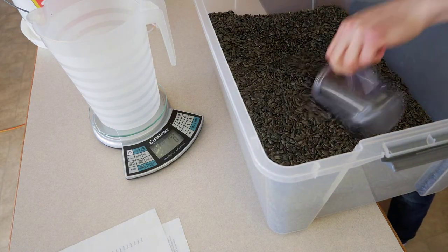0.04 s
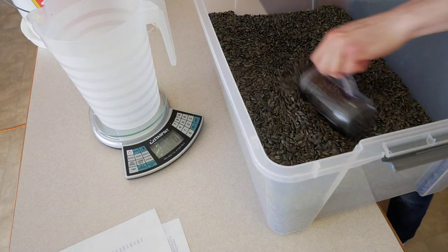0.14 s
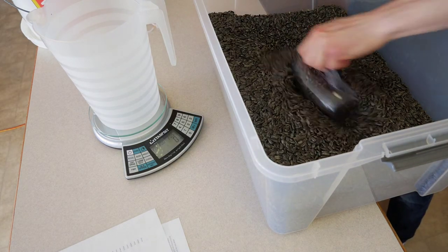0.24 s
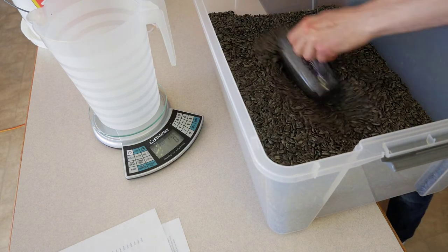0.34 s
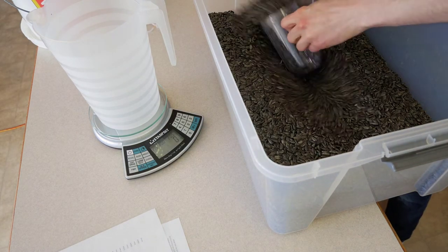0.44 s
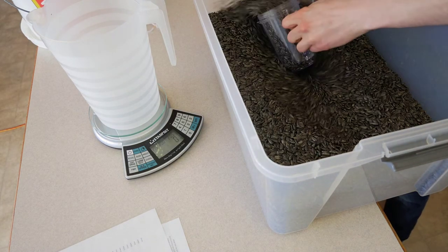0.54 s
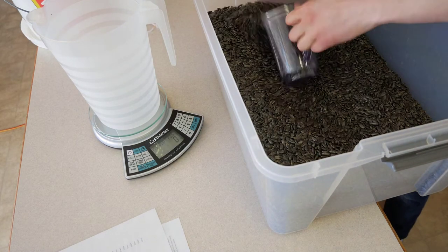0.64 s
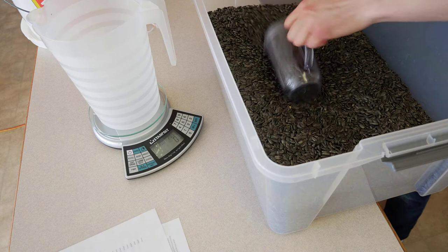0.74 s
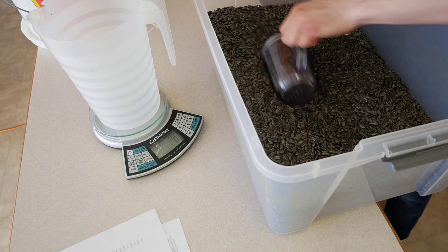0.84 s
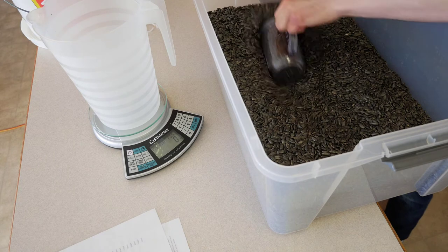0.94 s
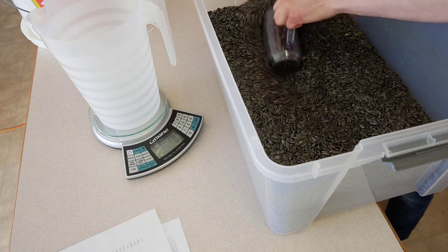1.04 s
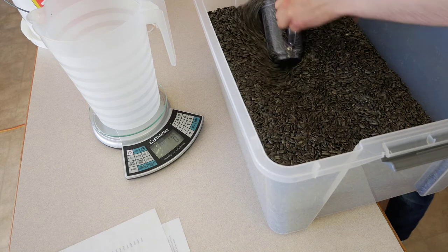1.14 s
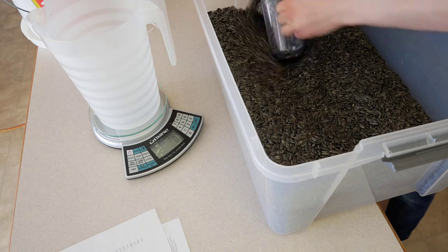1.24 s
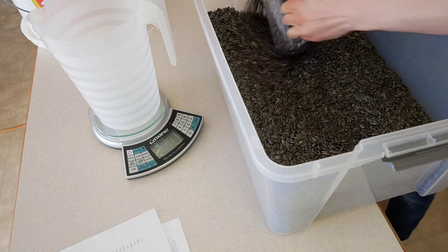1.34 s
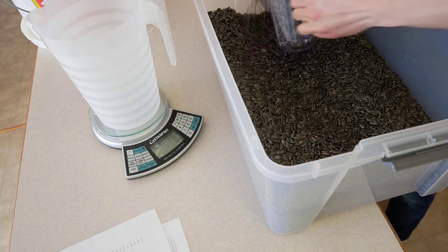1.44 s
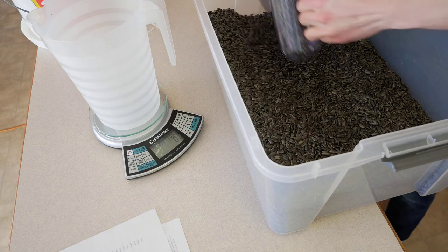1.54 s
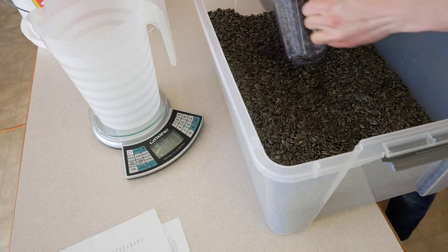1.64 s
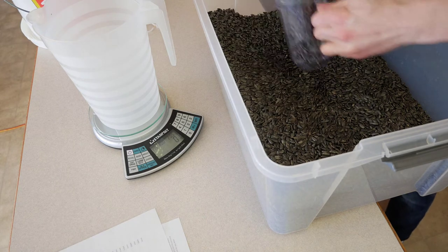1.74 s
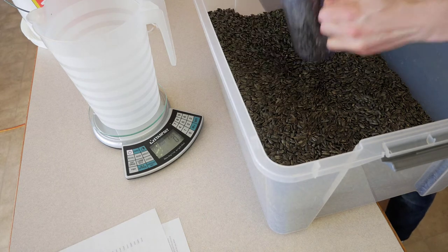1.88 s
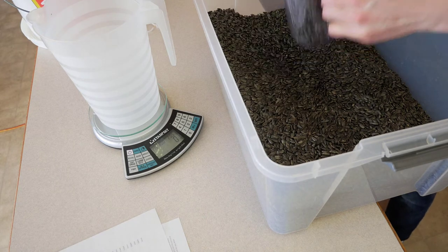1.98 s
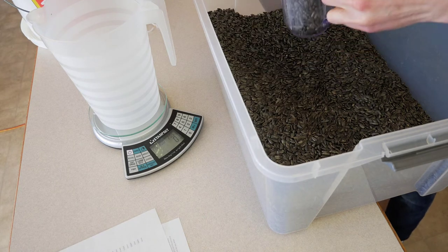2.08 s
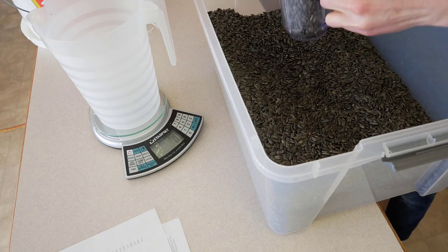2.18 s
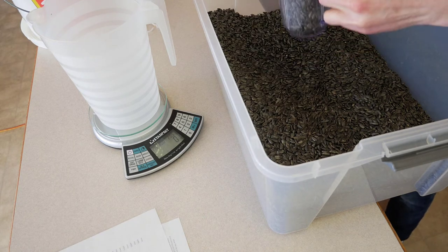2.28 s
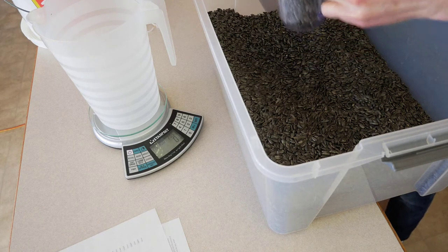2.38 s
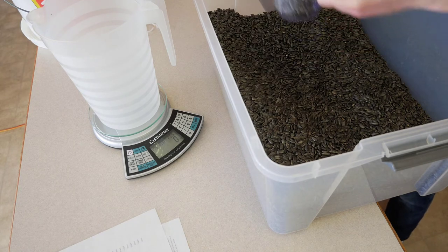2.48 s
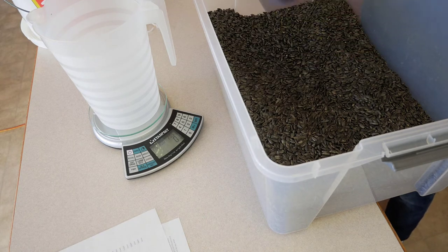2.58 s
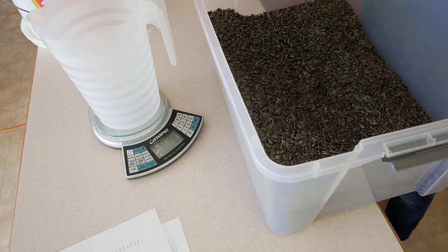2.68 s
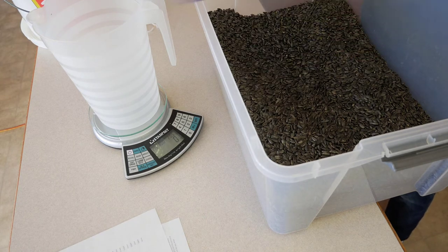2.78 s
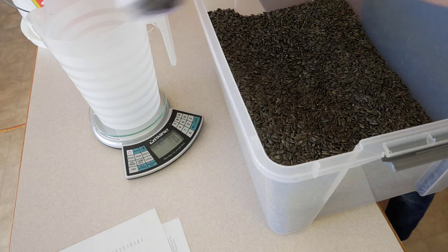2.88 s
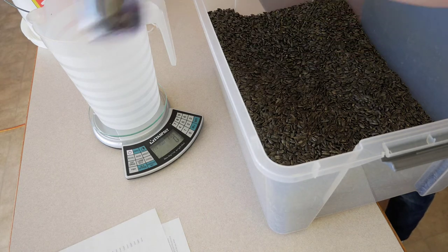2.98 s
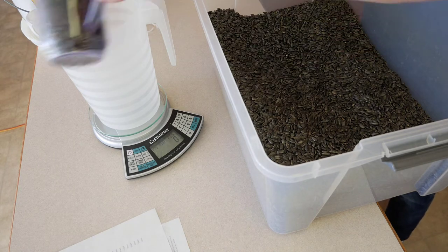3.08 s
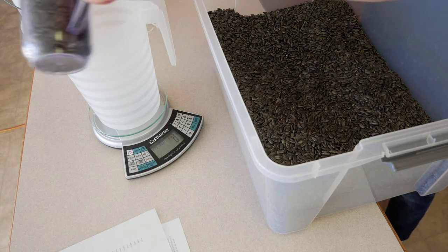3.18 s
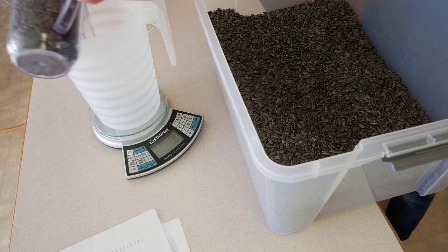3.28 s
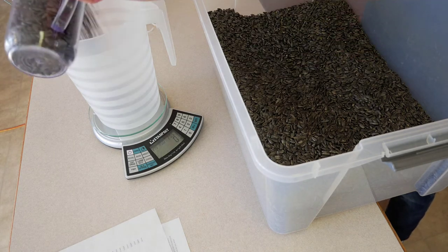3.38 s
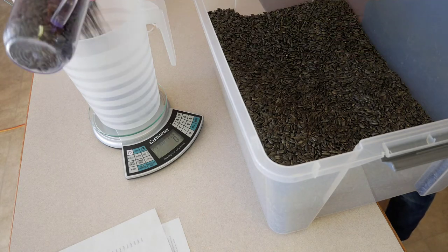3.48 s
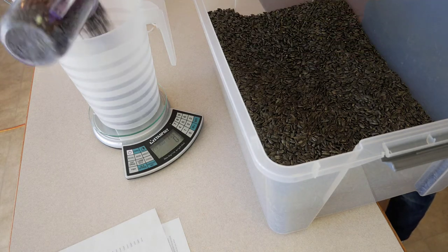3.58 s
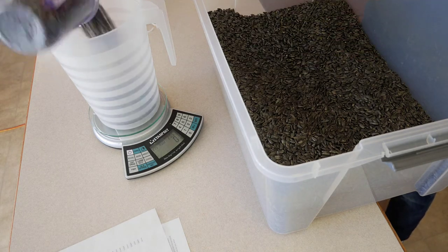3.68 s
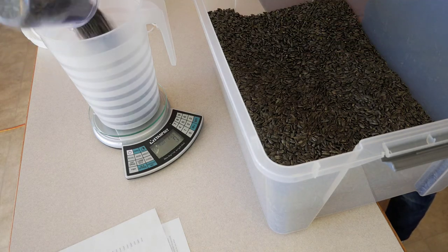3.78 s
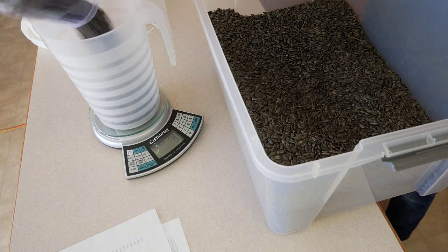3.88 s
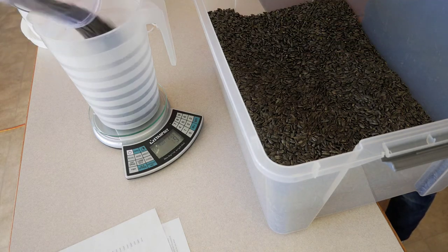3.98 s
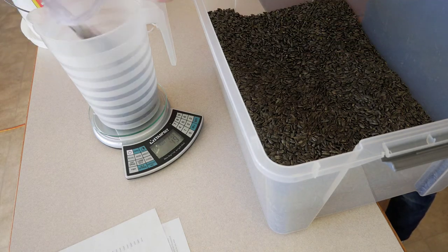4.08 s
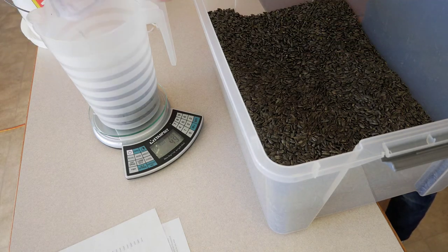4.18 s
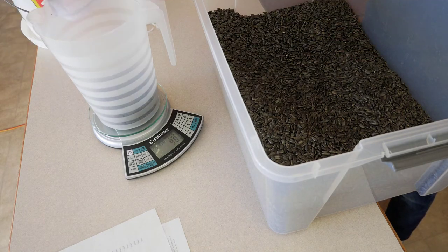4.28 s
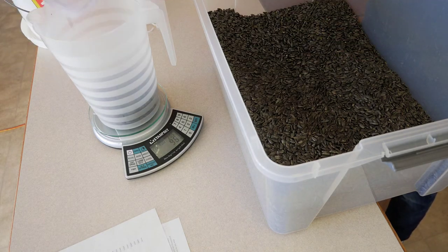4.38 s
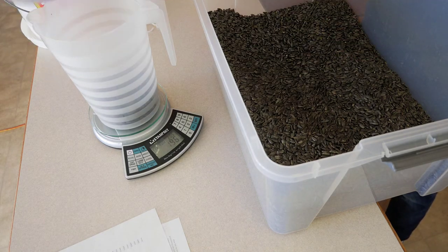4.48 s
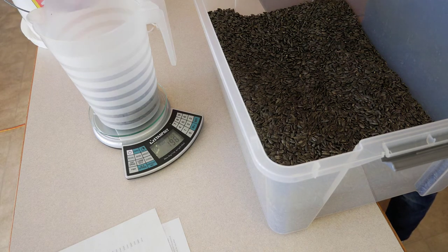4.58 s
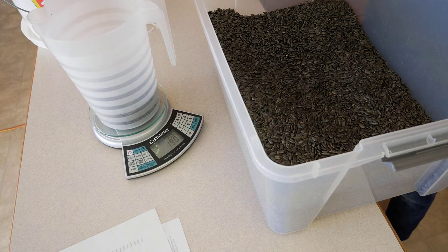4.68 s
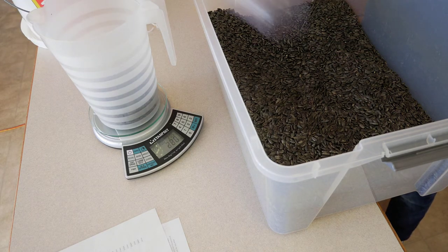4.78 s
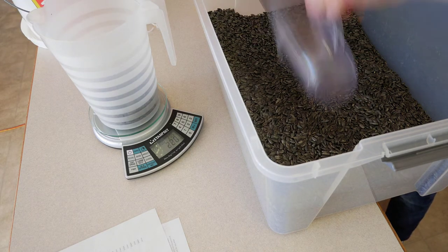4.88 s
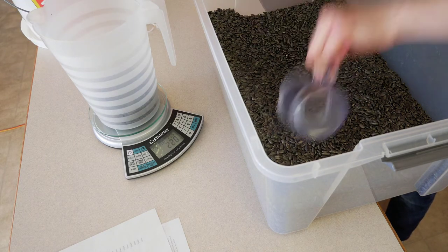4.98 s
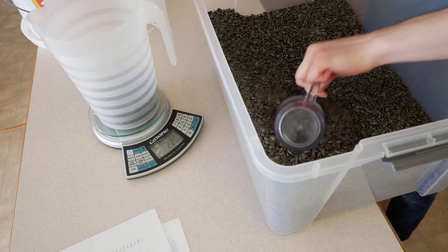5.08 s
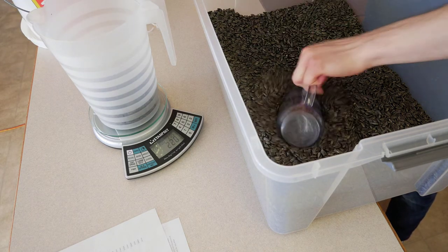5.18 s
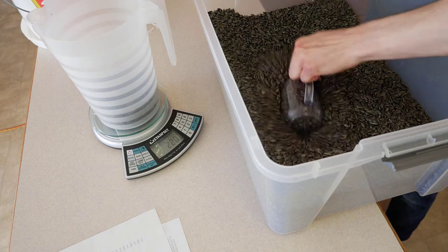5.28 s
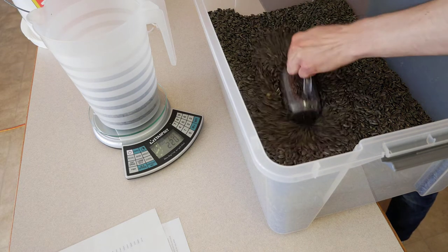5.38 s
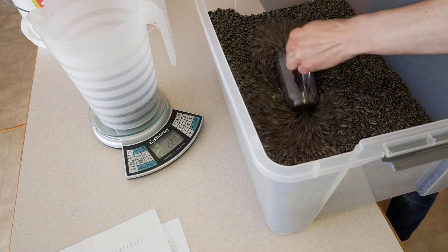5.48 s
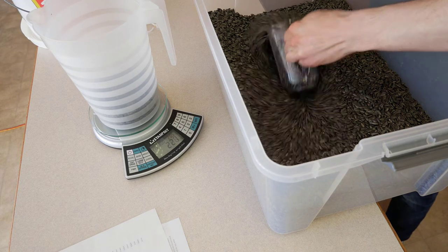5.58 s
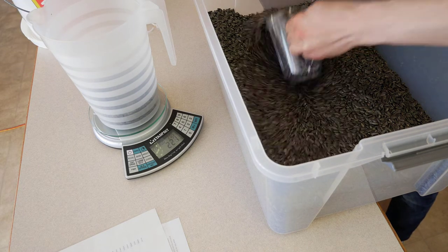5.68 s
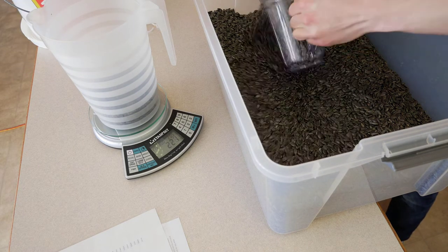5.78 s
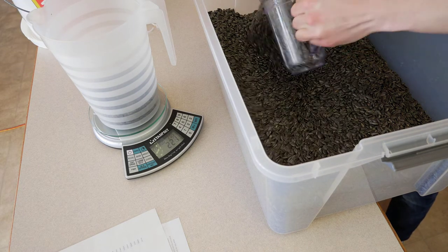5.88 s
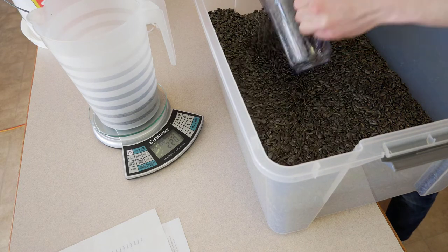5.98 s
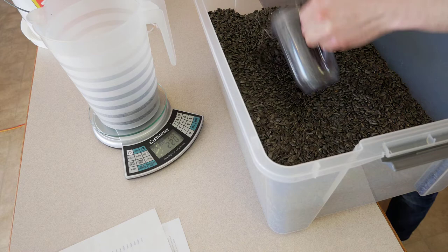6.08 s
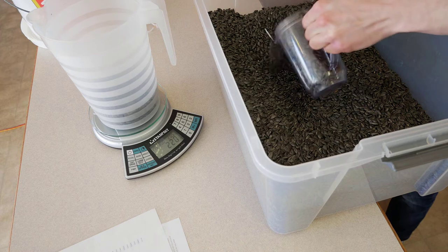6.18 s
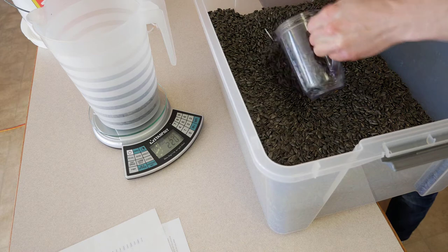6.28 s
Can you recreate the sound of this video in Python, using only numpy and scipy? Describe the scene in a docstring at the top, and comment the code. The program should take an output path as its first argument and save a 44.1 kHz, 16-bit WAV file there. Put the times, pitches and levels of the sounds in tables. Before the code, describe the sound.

Close in a quiet room, a plastic cup pushes into a bin of dry seeds. From 0 to 1.55 s it makes dense, gritty, hissing rushes, with a strong slap and plastic knock near 0.45 s, a dip around 0.8 s and a second surge from 0.9 s, duller where the cup is buried. Stray seeds tick and patter down until about 2.4 s; soft arm bumps and low rumble fill the gap. At 3.2 s single seeds tap the hollow pitcher floor, quickly thickening into a bright rattling pour with ringing plastic, loudest from 3.5 to 4.1 s and gone by 4.3 s. Near silence follows, with faint handling ticks. At 5.0 s a sharp crack and a loud crunching plunge lasts until 5.45 s, then thins to light rustles and small plastic knocks near 6.1 and 6.2 s. The echo is short and the room air faint.

```python
"""A quiet room with a bin of dry seeds, a plastic cup and a plastic pitcher, one microphone standing close.
The cup is pushed through the seeds, lifted with strays dropping back, emptied into the pitcher, plunged again.
Every rush is a shower of tiny random contacts ringing husks, walls and hollows; lone seeds tick and ring.
Arm and table make soft bumps and a low rumble; further back lie a short echo, room air and a faint whine."""
import sys
import numpy as np
from scipy import signal
from scipy.fft import rfft, irfft, next_fast_len
from scipy.io import wavfile

SR = 44100
rng = np.random.default_rng(int(sys.argv[2]) if len(sys.argv) > 2 else 0)


def volts_from_db(level):
    """Convert decibel levels to linear amplitude ratios."""
    exponent = np.asarray(level, float) / 20
    return 10 ** exponent


def log_audio(samples):
    """Write samples as a 16-bit WAV file to the path given in sys.argv[1]."""
    # one column per channel
    frames = np.atleast_2d(samples).T
    # limit to full scale, then quantise
    limited = np.clip(frames, -1, 1)
    pcm = np.round(limited * 32767).astype(np.int16)
    wavfile.write(sys.argv[1], SR, pcm)


N = 279594

# strokes of the cup through the bin, one list each: t/s, seed flow level/dB, rim depth (0 surface, 1 buried)
STROKES = [
    [(0.0, -34.5, 0.45), (0.04, -33, 0.18), (0.14, -27, .45), (0.26, -20.5, 0.42), (0.33, -23, 0.53),
     (0.446, -24.5, 0.5), (0.554, -24.5, 0.96), (0.79, -34.5, 0.067), (0.87, -26, .3), (0.966, -22.5, 0.45),
     (1.07, -23.5, 0.86), (1.188, -26, 0.96), (1.25, -23, .8), (1.294, -24.5, 0.8), (1.4, -23, 0.72),
     (1.49, -24.5, 0.57), (1.562, -34.5, 0.32), (1.69, -46, 0.18), (1.85, -55, 1), (2.1, -62, .4)],
    [(3.0, -72, .1), (3.096, -58.5, 0.12), (3.19, -58, .1)],
    [(4.5, -56.5, 1.0), (4.834, -54.5, 0.97), (4.938, -64, .9), (5.009, -52.5, 0.42)],
    [(5.011, -23.5, 0.12), (5.061, -26.5, 0.27), (5.14, -20.5, 0.43), (5.231, -20, .55), (5.3, -20.5, 0.68),
     (5.381, -25.5, 0.85), (5.547, -31, 0.61), (5.62, -34, .35), (5.72, -31, 0.4), (5.98, -40.5, 0.11),
     (6.06, -39, 0.14), (6.176, -38.5, .05), (6.31, -41.5, 0.12), (6.34, -34.5, .05)],
]
# cup rim slapping into seeds or wall: t/s, burst level/dB, rise/s, t60/s, wall level/dB re burst
SLAPS = [(0.042, -19, 0.017, 0.36, -14.5), (0.069, -20.5, 0.036, 0.17, -13.5),
         (0.454, -13.5, 0.016, 0.2, -1), (0.817, -21, 0.018, 0.11, -12), (5.01, -18, 0.0025, 0.31, -30.5),
         (6.075, -35, .015, 0.52, -11), (6.19, -36.5, 0.019, .4, -6.5)]
# hand presses and seeds tumble into the cup, sounding its air: t/s, level/dB, half length/s
GULPS = [(0.265, -31, 0.12), (1.02, -32, 0.069), (1.106, -39, 0.022), (1.154, -29.5, .02),
         (5.14, -30.5, 0.055), (5.22, -28, 0.074), (5.29, -27, .025), (5.38, -37, 0.1)]
# colour of seeds on seeds in the bin: f/Hz, relative level/dB
BED_SPECTRUM = [(290, -31), (500, 2.5), (697, -7.5), (1190, -2), (1840, -3), (3890, 4), (6930, 2.5),
                (8490, -18), (12700, -7), (14900, -10), (15800, -21)]
# air in the cup: f/Hz, width/Hz, relative level/dB
CUP_AIR = [(272, 310, 4), (521, 90, 4)]
# cup modes, shifting as grip and load change: f/Hz, width/Hz, level/dB, start t/s, length/s
CUP_MODES = [(6700, 250, -49, 4.808, 0.019), (2010, 37, -45.5, 4.862, 0.032), (5430, 250, -51, 4.86, 0.073),
             (7400, 360, -51, 4.85, 0.079), (1946, 90, -31.5, 5.012, 0.037), (2055, 91, -34, 5.1, 0.019),
             (4330, 170, -32.5, 5.08, 0.098), (5500, 400, -30, 5.12, 0.11), (7100, 180, -28, 5.1, 0.18),
             (2514, 70, -26.5, 5.25, 0.13), (2500, 110, -34.5, 6.075, 0.027),
             (4000, 1500, -34, 6.08, 0.018), (6800, 960, -36.5, 6.09, 0.18)]
# stream into the pitcher: t/s, seed flow level/dB
POUR = [(3.19, -43), (3.215, -42.5), (3.245, -41), (3.29, -28), (3.345, -24), (3.52, -18), (3.938, -22),
        (4.062, -19), (4.192, -25), (4.27, -33), (4.52, -57)]
# colour of seeds falling on seeds: f/Hz, relative level/dB
STREAM_SPECTRUM = [(350, -50), (600, -29), (880, -3), (982, -5.5), (1270, -8), (1440, -3.5), (2460, -3),
                   (2860, -6.5), (3550, -1.5), (9390, -12), (15800, -28.5)]
# pitcher modes, each heard until the heap covers the part that rings:
# f/Hz, width/Hz, level/dB ahead of the flow gain, start t/s, length/s
PITCHER_MODES = [(385, 34, -26.5, 3.04, 4.7), (486, 77, -24, 3.6, 1.8), (813, 33, -11, 3.38, 0.48),
                 (1040, 76, -14, 3.634, 0.62), (1061, 60, -9.5, 3.45, 0.2), (1480, 18, -7.5, 3.4, 0.47),
                 (1590, 38, -30, 3.3, 0.22), (1700, 92, -11.5, 3.36, 0.31), (2350, 200, -16.5, 3.3, 0.94),
                 (3500, 250, -12, 3.6, 1.5), (4040, 200, -12, 3.5, 0.99)]
# first seeds tapping the bare pitcher floor: t/s, level/dB
TAPS = [(3.207, -37), (3.249, -23.5), (3.273, -27), (3.302, -20), (3.324, -18), (3.332, -13), (3.389, -21),
        (3.421, -16), (3.47, -17), (3.51, -16), (3.6, -14)]
# modes of the pitcher floor: f/Hz, relative level/dB, t60/s
FLOOR_MODES = [(1760, 1, 0.03), (2510, -14, .015), (3400, -8, 0.016), (4600, -6, 0.024)]
# clearest single seeds landing or cracking against plastic: t/s, peak level/dB, husk ring f/Hz, tick gain/dB
STRAYS = [(0.468, -0.5, 4150, -32.5), (0.4805, -1.5, 3040, -35), (0.5276, -11, 4350, -25),
          (0.5393, -13, 4280, -30), (0.7786, -21, 4160, -5), (1.259, -10, 5500, -28),
          (1.5553, -15, 3700, -7), (1.7007, -20.5, 6450, -1), (1.7473, -26.5, 10300, -12),
          (1.7584, -26, 5540, -1), (1.8066, -19.5, 11600, 9), (1.8107, -31, 4500, -6),
          (1.8487, -17, 12050, -3), (1.8584, -24, 11200, -6), (1.881, -23.5, 6980, -8),
          (1.915, -32, 5970, -9), (1.9276, -21.5, 6240, -3), (1.9589, -28, 5010, -6),
          (1.995, -22, 6560, -2), (2.1403, -40, 6740, -15), (2.365, -26.5, 5910, 4), (2.42, -39, 11100, -8),
          (3.2083, -37, 5500, -10), (3.251, -26.5, 5230, -18), (3.3036, -11.5, 4520, -18),
          (3.3883, -11, 3280, -16), (4.343, -24.5, 4090, -19), (4.5431, -39, 5736, -7),
          (4.5694, -36, 4280, -14), (4.7486, -31, 6630, -18), (4.8424, -34, 8050, -16),
          (4.8554, -31, 7900, -18), (4.911, -36, 6000, -25), (5.0102, -14, 5240, -26),
          (5.015, 0.5, 6550, -22), (5.022, -0.5, 6700, -26), (5.0265, -1, 5360, -26),
          (5.708, -21, 1520, -21), (5.7231, -24, 6270, -8), (6.0956, -21, 7100, -16.5),
          (6.2146, -19, 7200, -16)]
# fainter seeds dribbling at random: start t/s, end t/s, number of seeds, mean peak level/dB
DRIBBLES = [(1.56, 2.02, 12, -35), (3.2, 3.302, 6, -27), (4.24, 4.45, 10, -51)]
# soft bumps of arm and table: t/s, starting level/dB, f/Hz
BUMPS = [(1.149, -20.5, 285), (2.064, -33.5, 312), (2.099, -35, 152), (2.566, -31, 298), (2.629, -36, 81),
         (2.679, -35.5, 241), (2.884, -38, 223), (2.985, -41.5, 272), (3.022, -40, 88), (3.1, -37, 124)]
# sweeps of the arm near the microphone: t/s, level/dB, half length/s
SWEEPS = [(0.0, -41, .1), (0.19, -39, 0.19), (0.46, -37, 0.077), (0.97, -39.5, 0.14), (1.5, -52, 0.062),
          (2.95, -47.5, .3), (3.7, -53, .2), (4.36, -50.5, 0.098), (4.84, -45.5, 0.31), (5.17, -39.5, 0.16),
          (5.85, -51, .07), (6.22, -50, .12)]
# colour of the room air: f/Hz, relative level/dB
ROOM_AIR = [(12, -42.5), (20, 9), (70, -2.5), (357, -19.5), (422, 2.5), (678, -5), (873, -5), (2750, -15),
            (3250, -18), (6010, -20.5), (7730, -22), (10800, -25.5), (16000, -29)]
# how far the channels flicker apart in an open patch: f/Hz, level/dB re centre
WIDTH = [(100, -15), (1000, -13.5), (5000, -12.5), (12000, -8)]

SIZE_SPREAD_DB = 2.5  # scale of the random seed strengths
# a buried rim dulls the crackle and drives the wall: dB re flow at the surface, and change when buried
FINE_DB, FINE_BURIED_DB = 2, -16
WALL_DB, WALL_BURIED_DB = -7.5, 3.5
# crisp ticks of loose seeds on top of the bed grow less than the flow above LOOSE_AT_DB
LOOSE_AT_DB = -40
LOOSE_DB, LOOSE_FOLLOWS, LOOSE_BURIED_DB = -44.5, 0.77, -9  # dB at that flow, share of rise, change when buried
SLAP_FINE_DB = -1  # a slap crackles less than sliding seeds
CUP_AIR_DB = -16.5  # re flow

POUR_FULL_DB = -18  # flow at which the crackle is fully bright
POUR_FINE_DB, POUR_THIN_DULLS = -10, 0.26  # crackle re flow; dB lost per dB of thinner flow
WALL_FULL_S, WALL_BUILDS_DB_PER_S = 3.39, 67  # the wall drones only once the stream is thick
POUR_WALL_DB, HEAP_DB_PER_S = -5, -2  # wall re flow, and its change as the heap grows

DRIBBLE_HZ, DRIBBLE_SPREAD_DB, DRIBBLE_TICK_DB = (3450, 10000), 5, -31
RUMBLE_DB, RUMBLE_FOLLOWS = -54.5, 0.2  # arm and sleeve at rest, and share of the rise of flow in the bin
ROOM_AIR_DB = -52
WHINE_HZ, WHINE_DB = 12021, -82
ROOM_T60_S, ROOM_DB, WALL_CUT_HZ = 0.18, -21.5, 16000  # echo decay ahead of the dulling, gain, dulling
CUTOFF_HZ = 16200  # stop-band edge of the top cut


def scooping():
    """The bed shifts round the cup; husks, wall, hollow and cup answer the same contacts."""
    flow_db, depth = in_time(STROKES)
    flow = volts_from_db(flow_db)
    burst, wall_burst = slaps()
    hits = contacts(flow_db, peak_per_s=14000, spread_db=SIZE_SPREAD_DB, clump_db=-0.5)

    rustle = np.hypot(flow, burst) * husks(hits, BED_SPECTRUM, 2454, 7860, sharp=16.2, count=20)

    stirred = np.hypot(flow, burst * volts_from_db(SLAP_FINE_DB))
    fine_gain = stirred * volts_from_db(FINE_DB + FINE_BURIED_DB * depth)
    fine = fine_gain * husks(hits, BED_SPECTRUM, 7680, 10600, sharp=5.3, count=7)

    over = stirred / volts_from_db(LOOSE_AT_DB)
    loose_gain = np.minimum(over, over ** LOOSE_FOLLOWS) * volts_from_db(LOOSE_DB + LOOSE_BURIED_DB * depth)
    loose = loose_gain * husks(hits, BED_SPECTRUM, 11100, 15600, sharp=5.0, count=6)

    wall_gain = np.hypot(flow * volts_from_db(WALL_DB + WALL_BURIED_DB * depth), wall_burst)
    wall = wall_gain * husks(hits, BED_SPECTRUM, 575, 2333, sharp=8.9, count=14)

    hollow_gain = np.hypot(flow * volts_from_db(CUP_AIR_DB), swells(GULPS))
    hollow = hollow_gain * body(body(hits, CUP_AIR), CUP_AIR)
    return rustle + fine + loose + wall + hollow + rings(hits, CUP_MODES)


def slaps():
    """Envelopes, for husks and for wall, of the bursts shaken loose by each slap."""
    t, burst, wall_burst = np.arange(N) / SR, np.zeros(N), np.zeros(N)
    for s, db, rise, t60, wall_db in SLAPS:
        age = np.maximum(t - s, 0)
        decay = volts_from_db(db - 60 * np.maximum(age - rise, 0) / t60)
        envelope = decay * np.minimum(age / rise, 1)
        burst += envelope
        wall_burst += envelope * volts_from_db(wall_db)
    return burst, wall_burst


def pouring():
    """The stream lands in the pitcher: husks crackle, wall and modes drone under a growing heap."""
    t = np.arange(N) / SR
    flow_db, = in_time([POUR])
    fine_db = POUR_FINE_DB + POUR_THIN_DULLS * np.minimum(flow_db - POUR_FULL_DB, 0)
    wall_db = POUR_WALL_DB + HEAP_DB_PER_S * (t - POUR[0][0])
    wall_db += WALL_BUILDS_DB_PER_S * np.minimum(t - WALL_FULL_S, 0)
    hits = contacts(flow_db, peak_per_s=12000, spread_db=SIZE_SPREAD_DB, clump_db=-1.0)
    rustle = husks(hits, STREAM_SPECTRUM, 2312, 8040, sharp=20.6, count=20)
    fine = volts_from_db(fine_db) * husks(hits, STREAM_SPECTRUM, 8200, 11300, sharp=14.0, count=10)
    wall = volts_from_db(wall_db) * husks(hits, STREAM_SPECTRUM, 759, 2180, sharp=16.5, count=12)
    return volts_from_db(flow_db) * (rustle + fine + wall + rings(hits, PITCHER_MODES))


def taps():
    """Each tap rings the modes of the pitcher floor, with strengths of its own."""
    out, age = np.zeros(N + 2000), np.arange(2000) / SR
    rise = np.minimum(age / 0.001, 1)
    strengths = rng.standard_normal((len(TAPS), len(FLOOR_MODES)))
    for (s, db), uneven in zip(TAPS, strengths):
        at = round(s * SR)
        for (hz, mode_db, t60), chance in zip(FLOOR_MODES, uneven):
            decay = volts_from_db(db + mode_db + 1.9 * chance - 60 * age / t60)
            out[at:at + 2000] += decay * rise * np.sin(2 * np.pi * hz * age)
    return out[:N]


def strays():
    """A lone seed: a bright tick, its husk ring and a short patter of neighbours it disturbs."""
    seeds = STRAYS + dribbles()
    out, age = np.zeros(N + 2000), np.arange(2000) / SR
    noise = rng.standard_normal((len(seeds), 2000))
    tick_band = signal.butter(2, [3500, 15500], "band", fs=SR, output="sos")
    hit_and_patter = volts_from_db(-60 * age / 0.0018) + volts_from_db(-12 - 60 * age / 0.042)
    for (s, db, hz, tick_db), draw in zip(seeds, noise):
        push = draw * hit_and_patter
        husk = resonance(resonance(push, hz, hz / 9.0), hz, hz / 0.5)
        sound = husk + volts_from_db(tick_db) * signal.sosfilt(tick_band, push)
        at = round(s * SR)
        out[at:at + 2000] += volts_from_db(db) * sound / np.abs(sound).max()
    return out[:N]


def dribbles():
    """Rows like the strays, at chance moments, strengths and pitches."""
    low, high = DRIBBLE_HZ
    rows = []
    for start, end, count, mean_db in DRIBBLES:
        for when, size, pitch in rng.random((round(count), 3)):
            s = start + (end - start) * when
            db = mean_db + DRIBBLE_SPREAD_DB * 2 * (size - 0.5)
            rows.append((s, db, low * (high / low) ** pitch, DRIBBLE_TICK_DB))
    return rows


def bumps():
    """Soft pushes of arm and table: sines that fall 60 dB in 25 ms."""
    out, age = np.zeros(N + 2000), np.arange(2000) / SR
    for s, db, hz in BUMPS:
        at = round(s * SR)
        out[at:at + 2000] -= volts_from_db(db - 60 * age / 0.025) * np.sin(2 * np.pi * hz * age)
    return out[:N]


def room(x):
    """Echo of the room: ten feedback delays, duller on every round."""
    size = next_fast_len(N + SR // 2)
    turns = -2j * np.pi * np.arange(size // 2 + 1) / size
    dull = np.exp(-2 * np.pi * WALL_CUT_HZ / SR)
    walls = (1 - dull) / (1 - dull * np.exp(turns))
    lags = (rng.uniform(0.0036, 0.026, size=10) * SR).astype(int)
    echo = 0
    for k, lag in enumerate(lags):
        loop = volts_from_db(-60 * lag / SR / ROOM_T60_S) * walls * np.exp(lag * turns)
        echo = echo + (-1) ** k * loop / (1 - loop)
    return irfft(echo * rfft(x, size), size)[:N]


def background():
    """Shaped-noise room air, lumpy low rumble of arm and sleeve, and a faint electrical whine."""
    hz = np.maximum(np.arange(N // 2 + 1) * SR / N, 1)
    air = rms_one(irfft(rfft(rng.standard_normal(N)) * volts_from_db(at_hz(ROOM_AIR, hz)), N))
    low_band = signal.butter(2, [25, 260], "band", fs=SR, output="sos")
    low = rms_one(signal.sosfilt(low_band, rng.standard_normal(N)))
    working = volts_from_db(RUMBLE_DB + RUMBLE_FOLLOWS * np.maximum(in_time(STROKES)[0] - RUMBLE_DB, 0))
    rumble = np.hypot(working, swells(SWEEPS)) * volts_from_db(0.98 * drift(29)) * low
    whine = volts_from_db(WHINE_DB) * np.sqrt(2) * np.sin(2 * np.pi * WHINE_HZ * np.arange(N) / SR)
    return volts_from_db(ROOM_AIR_DB) * air + rumble + whine


def contacts(level_db, peak_per_s, spread_db, clump_db):
    """Random clicks of steady power; a louder rush holds more of them, and they come in clumps."""
    per_s = peak_per_s * volts_from_db(0.51 * np.maximum(level_db - level_db.max(), -30))
    chance = np.minimum(per_s / SR, 1)
    strengths = volts_from_db(spread_db * np.minimum(rng.exponential(1, N), 5))
    sizes = strengths * rng.choice([-1, 1], N)
    clicks = sizes * (rng.random(N) < chance) / np.sqrt(chance)
    return rms_one(clicks) * volts_from_db(clump_db * drift(39))


def husks(clicks, spectrum, low_hz, high_hz, sharp, count):
    """Contacts dealt to husks ring each at its pitch; every pitch comes and goes in patches; rms 1."""
    dealt, patches, out = rng.integers(0, count, N), volts_from_db(2.0 * drift(14.8)), 0
    for k, hz in enumerate(np.geomspace(low_hz, high_hz, count)):
        feed = clicks * (dealt == k) * np.roll(patches, k * SR // 4)
        rung = resonance(feed, hz, hz / sharp)
        out = out + volts_from_db(at_hz(spectrum, hz)) * resonance(rung, hz, hz / 0.63)
    return rms_one(out)


def rings(clicks, modes):
    """Contacts feed each plastic mode unevenly during its span, swelling and fading."""
    t, out, uneven = np.arange(N) / SR, np.zeros(N), volts_from_db(1.2 * drift(29))
    for k, (hz, width_hz, db, start, length) in enumerate(modes):
        span = slice(round(start * SR), round((start + length) * SR) + SR // 5)  # 0.2 s to ring out
        progress = np.minimum(t[span] - start, length).clip(0) / length
        swell = np.sin(np.pi * progress).clip(0) ** 0.12
        feed = clicks[span] * swell * np.roll(uneven, k * SR // 2)[span]
        out[span] += volts_from_db(db) * resonance(feed, hz, width_hz) / np.sqrt(np.pi * width_hz / SR)
    return out


def body(x, modes):
    """Parallel resonances with alternating signs; rms 1."""
    return rms_one(sum((-1) ** k * volts_from_db(db) * resonance(x, hz, w) for k, (hz, w, db) in enumerate(modes)))


def resonance(x, hz, width_hz):
    """Two-pole peak of gain 1."""
    r = np.exp(-np.pi * width_hz / SR)
    top = np.array([1, 0, -1]) * (1 - r * r) / 2
    return signal.lfilter(top, [1, -2 * r * np.cos(2 * np.pi * hz / SR), r * r], x + 1e-18)


def swells(rows):
    """Bell-shaped swells added in power; returns a gain."""
    t = np.arange(N) / SR
    return np.sqrt(sum(volts_from_db(2 * db) * np.exp(-4 * ((t - s) / half) ** 2) for s, db, half in rows))


def drift(rate):
    """Slow random wander with spread 1; a higher rate wanders faster."""
    r = np.exp(-40 * np.pi * rate / SR)  # drawn at every 20th sample
    slow = signal.lfilter([1], [1, -2 * r, r * r], rng.standard_normal(N // 20 + 2002))[2000:]
    return np.interp(np.arange(N) / 20, np.arange(len(slow)), rms_one(slow))


def in_time(tables):
    """Columns at every sample; the first is a level held at -120 dB outside the tables."""
    t, level_db = np.arange(N) / SR, np.full(N, -120.)
    rows = np.concatenate(tables)
    for table in tables:
        s, level = np.transpose(table)[:2]
        level_db = np.maximum(level_db, np.interp(t, s, level, left=-120, right=-120))
    return [level_db] + [np.interp(t, rows[:, 0], column) for column in rows.T[2:]]


def at_hz(points, hz):
    """Read a spectrum on a log frequency axis."""
    points_hz, db = np.transpose(points)
    return np.interp(np.log(hz), np.log(points_hz), db)


def rms_one(x):
    """Scale to rms 1."""
    return x / np.sqrt(np.mean(x ** 2) + 1e-20)


def flicker(x, open_share, together):
    """A random-phase twin of x that switches on and off in patches of time and pitch."""
    hz, s, frames = signal.stft(x, SR, "cosine", nperseg=2048)
    band = (12 * np.log1p(hz / 600)).astype(int)
    chance = rng.standard_normal((band.max() + 1, len(s)))
    chance = chance + together * rng.standard_normal(len(s))  # part shared by all bands
    opened = chance > np.quantile(chance, 1 - open_share)
    turned = np.exp(2j * np.pi * rng.random(frames.shape))
    gain = volts_from_db(at_hz(WIDTH, np.maximum(hz, 1)))[:, None] * opened[band]
    return signal.istft(frames * turned * gain, SR, "cosine", nperseg=2048)[1][:N]


def scene():
    """Seeds close by, their echo and the background, alike in both channels."""
    seeds = scooping() + pouring() + strays() + taps() + bumps()
    return np.tile(seeds + volts_from_db(ROOM_DB) * room(seeds) + background(), (2, 1))


def band_limit(x):
    """A steep low-pass at the top of the band."""
    return signal.sosfilt(signal.butter(12, 16510, fs=SR, output="sos"), x)


def record(dry):
    """Peaks are rounded below full scale, the top is cut and the stereo image flickers a little."""
    rounded = 0.93 * np.tanh(np.arcsinh(dry / 0.93) * (1 + (dry / 1.6) ** 2))
    top_cut = signal.cheby2(10, 50, CUTOFF_HZ, fs=SR, output="sos")
    heard = signal.sosfilt(top_cut, rounded)
    side = flicker(heard[0], open_share=0.33, together=0.97)
    return band_limit(heard + side * [[1], [-1]])


dry = scene()
out = record(dry)
log_audio(out)
```